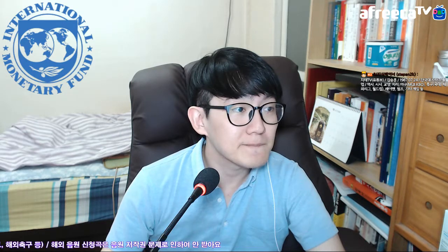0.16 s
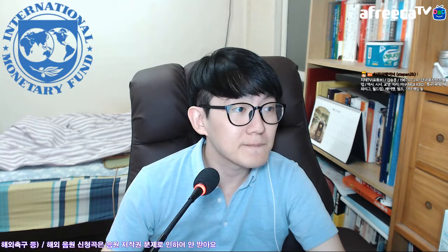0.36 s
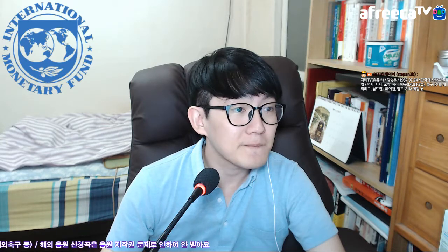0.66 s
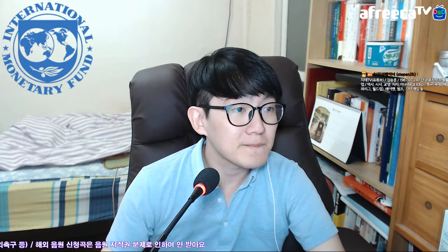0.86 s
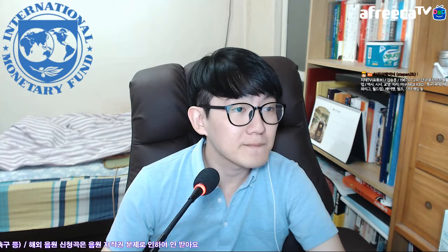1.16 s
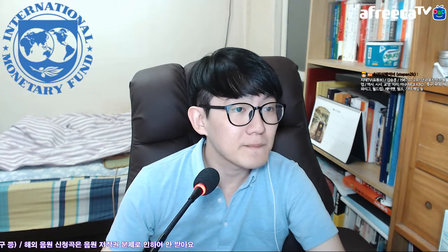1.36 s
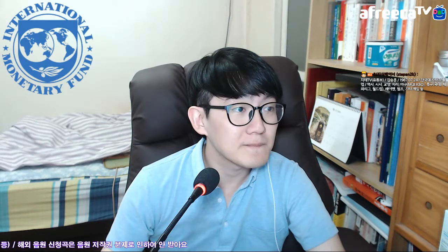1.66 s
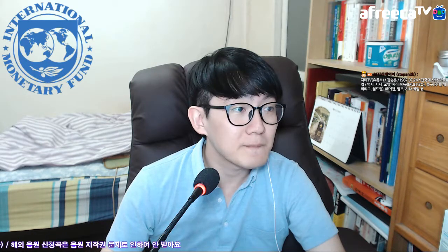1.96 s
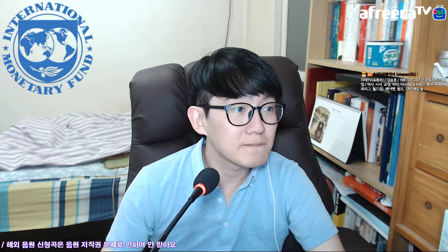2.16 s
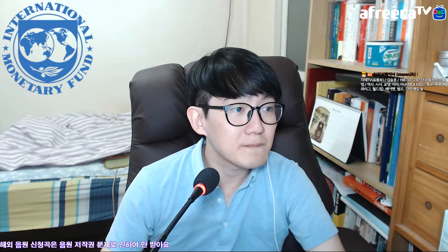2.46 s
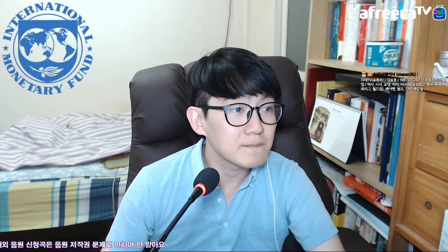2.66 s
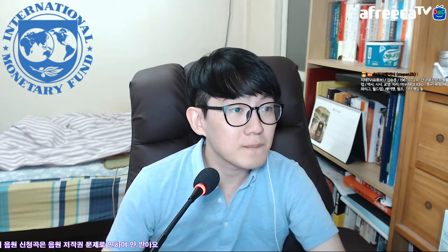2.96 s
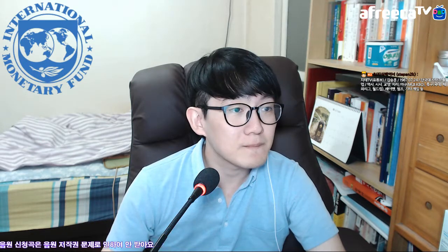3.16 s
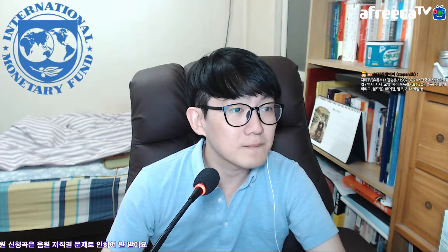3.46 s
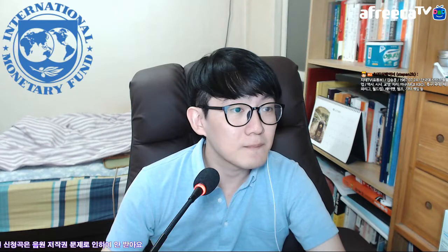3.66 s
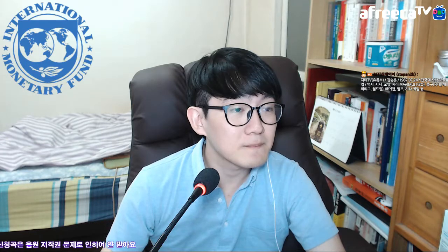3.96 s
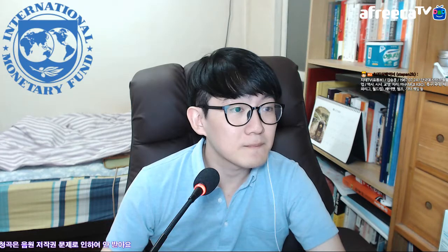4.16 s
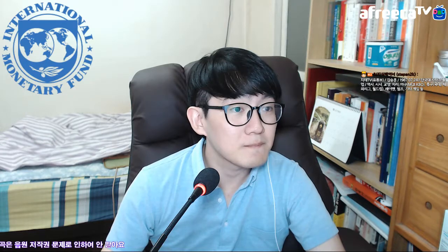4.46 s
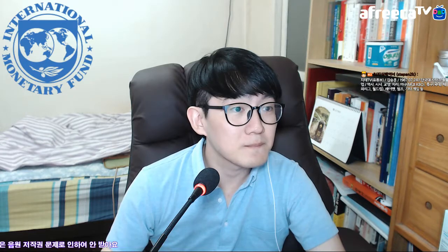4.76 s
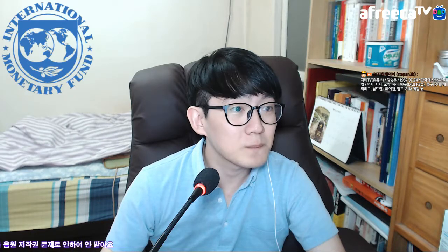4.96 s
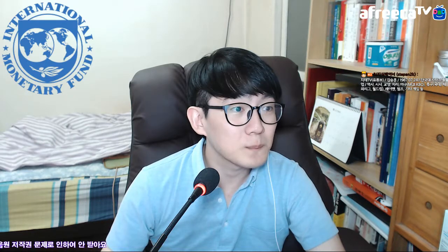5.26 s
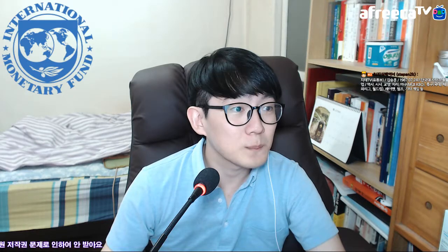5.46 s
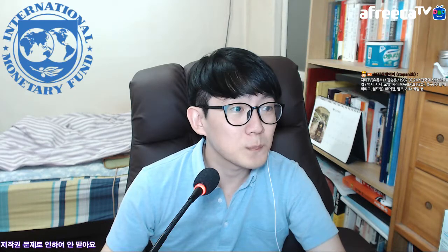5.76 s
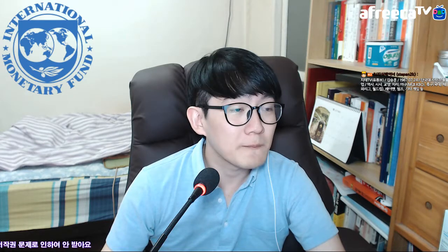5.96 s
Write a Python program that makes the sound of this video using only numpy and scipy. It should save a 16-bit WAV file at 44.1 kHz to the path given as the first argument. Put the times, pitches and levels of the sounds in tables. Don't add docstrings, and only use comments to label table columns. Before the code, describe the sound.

A steady low mains hum with a buzzy edge fills a quiet room, after one tiny plastic switch rattle, over faint fan drone and hiss.

```python
import sys
import numpy as np
from scipy import signal
from scipy.fft import rfft, irfft, next_fast_len
from scipy.io import wavfile

SR = 44100
rng = np.random.default_rng(int(sys.argv[2]) if len(sys.argv) > 2 else 0)


def ratio_of_db(decibels):
    return 10 ** (np.asarray(decibels, float) / 20)


def store_pcm(level_fs):
    pcm = np.round(np.clip(level_fs, -1, 1) * 32767).astype(np.int16)
    wavfile.write(sys.argv[1], SR, np.atleast_2d(pcm).T)


N = 269054

# multiple of the mains, peak level/dB
HUM_OVERTONES = [(1, -34), (2, -55.5), (3, -56), (4, -67), (5, -64), (6, -76.5), (7, -69.5), (9, -74),
                 (10, -80.5), (11, -72.5), (12, -84.5), (13, -84), (14, -85), (15, -82.5)]
# t/s, peak level/dB, dullness (higher = duller)
SWITCH_TOUCHES = [
    (0.0226, -53, .2),
    (.0251, -54.5, 1.15),
    (.0365, -66, -0.42),
    (0.041, -55, .3),
    (.0470, -55, .2),
    (.0565, -64, .1),
    (.0605, -62, .5),
    (.297, -70, -.8),
]
# f/Hz, level/dB, t60/s
SWITCH_MODES = [(1690, -6, 0.014), (2210, -1.5, 0.017), (2600, 1, 0.013), (3130, -3, 0.013),
                (3430, -2, 0.012), (3900, 2, 0.0059), (4540, -2, .009), (4900, -8, 0.0092),
                (5740, -16, .007), (6500, -17, .007)]
# level/dB, t60/s
SWITCH_TAIL = (-70.5, 0.25)
# multiple of the turning rate, peak level/dB
FAN_TONES = [(1, -59.5), (7, -66.5), (12, -90), (20, -80), (24, -91), (31, -89.5), (36, -89), (60, -95.5)]
# f/Hz, level/dB per Hz
AIR_SPECTRUM = [(3, -66), (11, -83.5), (90, -90), (170, -94), (480, -100), (1500, -104), (3300, -108.5),
                (9000, -122)]
# f/Hz, width/Hz, level/dB per Hz
CASE_MODES = [(331, 59, -99), (580, 120, -100), (1072, 245, -101), (1340, 9.8, -103), (2030, 210, -107),
              (2130, 29, -102)]
# f/Hz, width/Hz, level/dB per Hz
LOWEST_ROOM_MODE = (61.4, 38, -75.5)
# f/Hz, level/dB re mean
STREAM_BAR = [(2000, -12), (6000, -4.5), (9000, -.6), (15000, 1.0)]


def overtones():
    first, last = 17, 29
    first_db, loss_db, scatter_db = -87, 0.5, 2.5
    k = np.arange(first, last + 1)
    peak_db = first_db - loss_db * (k - first) + scatter_db * rng.standard_normal(len(k))
    return [*HUM_OVERTONES, *zip(k, peak_db)]


def mains_hum():
    mains_hz, start_rad, overtone_lag_rad = 59.971, 1.33, 0.8
    phase = 2 * np.pi * mains_hz * np.arange(N) / SR + start_rad
    lines = overtones()
    scatter = rng.uniform(-np.pi, np.pi, len(lines))
    hum = np.zeros(N)
    for (k, peak_db), chance in zip(lines, scatter):
        side = -1 if k > 2 and k % 2 == 0 else 1
        lag = side * overtone_lag_rad * (k > 1)
        lag += chance * (k > 9)
        hum += ratio_of_db(peak_db) * np.cos(k * phase - lag)
    return hum


def contacts():
    bounce_s, bounce_loss_db, bounce_dull_share = 0.0027, 2, 0.3
    t, peak_db, dull = np.transpose(SWITCH_TOUCHES)
    times = np.r_[t, t + bounce_s]
    levels = np.r_[peak_db, peak_db - bounce_loss_db]
    return times, levels, np.r_[dull, bounce_dull_share * dull]


def scrape(hz):
    length = int(0.0025 * SR)
    drag = rng.standard_normal(length) * np.hanning(length)
    at_mode = abs(drag @ np.exp(2j * np.pi * hz * np.arange(length) / SR))
    return drag / (at_mode + np.linalg.norm(drag) / 2)


def switch_rattle():
    t, peak_db, dull = contacts()
    spread = rng.standard_normal((len(t), len(SWITCH_MODES)))
    span = SR // 2
    rattle = np.zeros(span)
    for k, (hz, mode_db, t60) in enumerate(SWITCH_MODES):
        tilt_db = -16 * (dull - 0.3) * np.log2(hz / 3000)
        strike_db = peak_db + mode_db - 1.0 + tilt_db + 2.6 * spread[:, k]
        strikes = np.zeros(span)
        strikes[(t * SR).astype(int)] = ratio_of_db(strike_db) * np.sign(spread[:, k - 1])
        strikes = np.convolve(strikes, scrape(hz))[:span]
        decay, turn = ratio_of_db(-60 / (t60 * SR)), 2 * np.pi * hz / SR
        ring = [1, -2 * decay * np.cos(turn), decay * decay]
        rattle += signal.lfilter([0, np.sin(turn)], ring, strikes)
    tail_db, tail_t60 = SWITCH_TAIL
    after = np.arange(span) / SR - t[1]
    band = signal.butter(2, [800, 5600], "band", fs=SR, output="sos")
    smear = signal.sosfilt(band, rng.standard_normal(span))
    rattle += smear * (after > 0) * ratio_of_db(tail_db + 3.5 - 60 * after / tail_t60)
    return np.pad(rattle, (0, N - span))


def drift(rate):
    hop = 40
    r = np.exp(-2 * np.pi * hop * rate / SR)
    slow = signal.lfilter([1], [1, -2 * r, r * r], rng.standard_normal(N // hop + 4002))[4000:]
    return np.interp(np.arange(N) / hop, np.arange(len(slow)), slow / np.std(slow))


def turning(hz, wander_hz, rate):
    wander = drift(rate)
    return 2 * np.pi * np.cumsum(hz + wander_hz * (wander - wander.mean())) / SR


def fan():
    phase = turning(52.47, wander_hz=0.043, rate=2.1)
    drone = np.zeros(N)
    for k, peak_db in FAN_TONES:
        flutter_db = 1.7 * drift(3.2)
        drone += ratio_of_db(peak_db + flutter_db) * np.cos(k * phase + 5.0 * rng.random())
    return drone


def coil_whine():
    coil_db, clock_db, clock_hz = -79, -95, 4000.2
    phase = turning(3861.5, wander_hz=0.8, rate=1.1)
    tone = np.cos(phase) + ratio_of_db(-18) * np.cos(2 * phase)
    clock = ratio_of_db(clock_db) * np.cos(2 * np.pi * clock_hz * np.arange(N) / SR)
    return ratio_of_db(coil_db + 0.6 * drift(3.1)) * tone + clock


def coloured(power):
    size = next_fast_len(N)
    hz = np.maximum(np.arange(size // 2 + 1) * SR / size, 1)
    return irfft(rfft(rng.standard_normal(size)) * np.sqrt(power(hz) * SR / 2), size)[:N]


def air_power(hz):
    hz_at, db_at = np.transpose(AIR_SPECTRUM)
    return ratio_of_db(np.interp(np.log(hz), np.log(hz_at), db_at)) ** 2


def resonance_power(hz):
    humps = 0
    for centre, width, db in [*CASE_MODES, LOWEST_ROOM_MODE]:
        humps = humps + ratio_of_db(db) ** 2 / (1 + (2 * (hz - centre) / width) ** 2) ** 2
    return humps


def air():
    broad = coloured(air_power) * ratio_of_db(0.5 * drift(6.2))
    humps = coloured(resonance_power) * ratio_of_db(0.52 * drift(3.0))
    return broad + humps


def preamp_hiss():
    return coloured(lambda hz: np.full_like(hz, ratio_of_db(-112.5) ** 2))


def thin_stream(x):
    top_hz = 15730
    frame = dict(window="cosine", nperseg=2048, noverlap=1024)
    hz, _, bins = signal.stft(x, SR, **frame)
    size = np.abs(bins)
    hz_at, db_at = np.transpose(STREAM_BAR)
    bar_db = np.interp(hz, hz_at, db_at, left=-60)
    bar = ratio_of_db(bar_db)[:, None] * size.mean(axis=-1, keepdims=True)
    kept = (size > bar) * (hz < top_hz)[:, None]
    lost = np.sum(size ** 2, -1) / (np.sum((size * kept) ** 2, -1) + 1e-30)
    kept = kept * lost[..., None] ** 0.71
    return signal.istft(bins * kept, SR, **frame)[1][:, :N]


def scene():
    return (mains_hum() + switch_rattle() + fan() + coil_whine() + air())[None]


def low_pass(x):
    return signal.sosfilt(signal.butter(12, 15910, fs=SR, output="sos"), x)


def record(dry):
    mix = thin_stream(dry + preamp_hiss())
    return low_pass(mix)


dry = scene()
out = record(dry)
store_pcm(out)
```